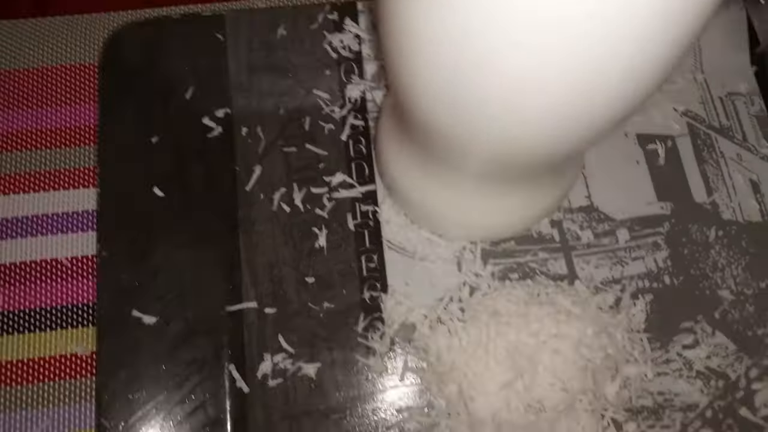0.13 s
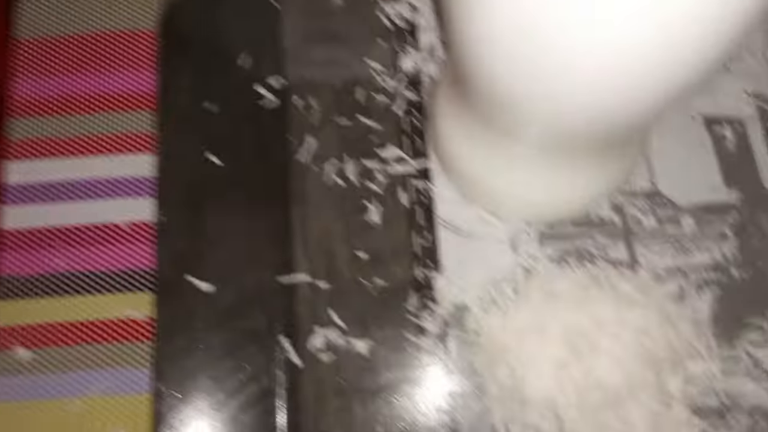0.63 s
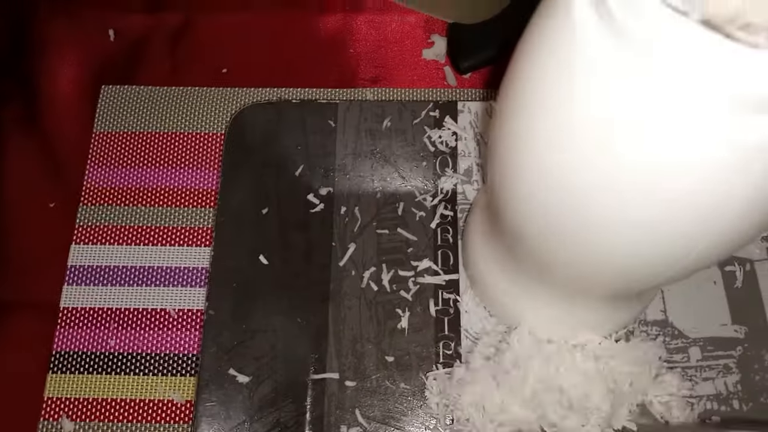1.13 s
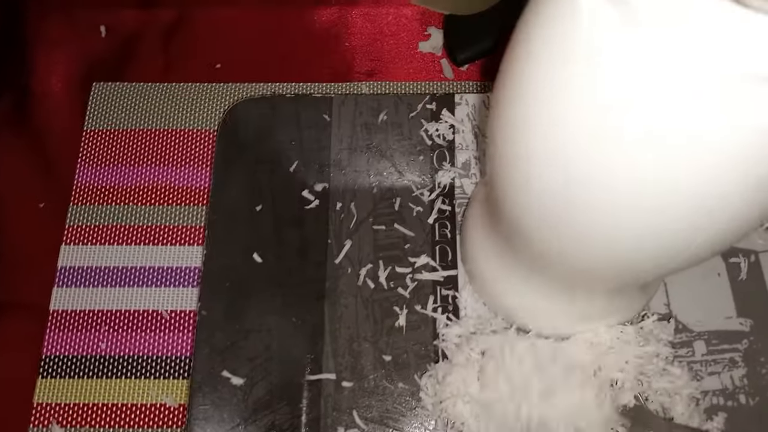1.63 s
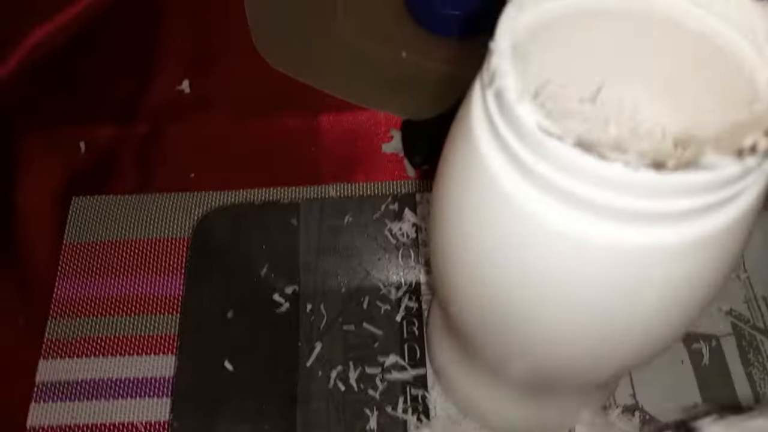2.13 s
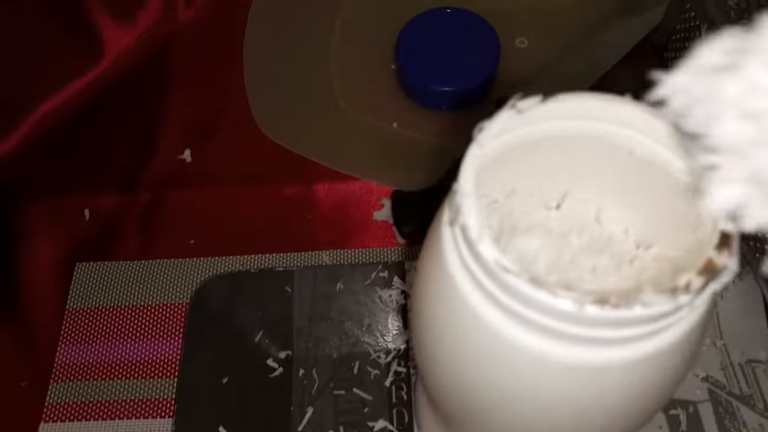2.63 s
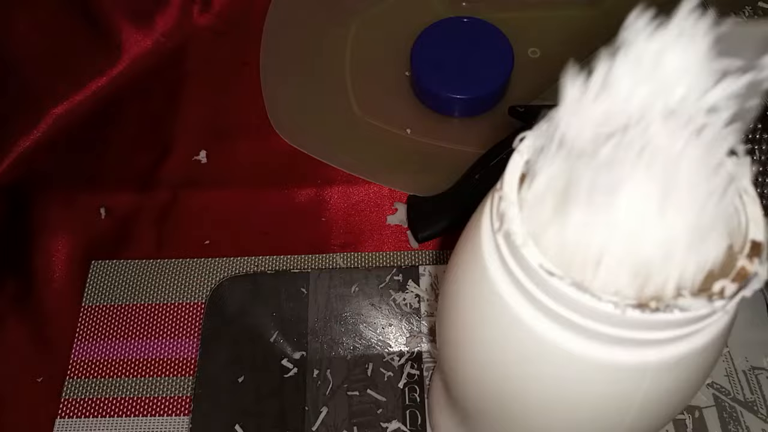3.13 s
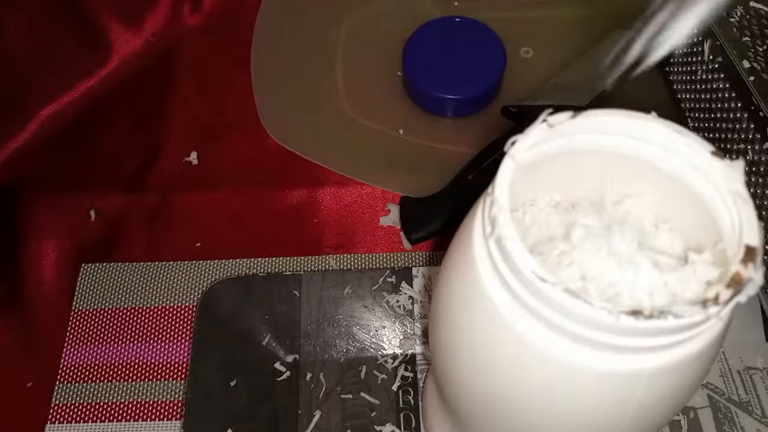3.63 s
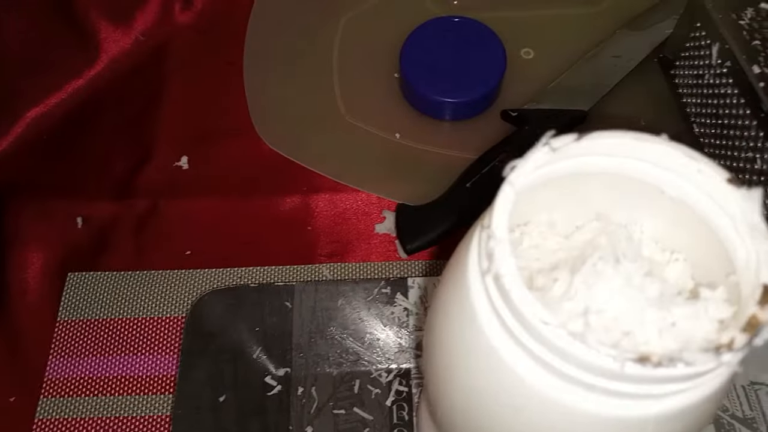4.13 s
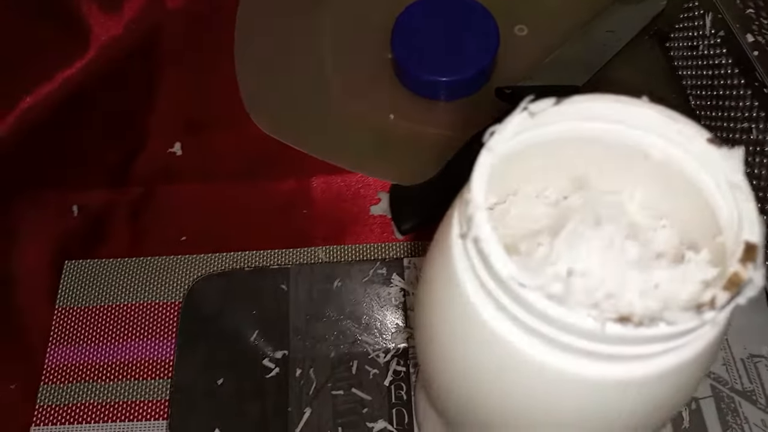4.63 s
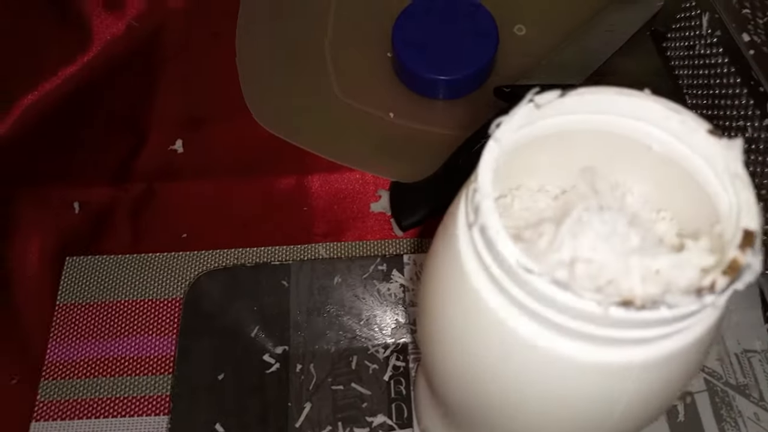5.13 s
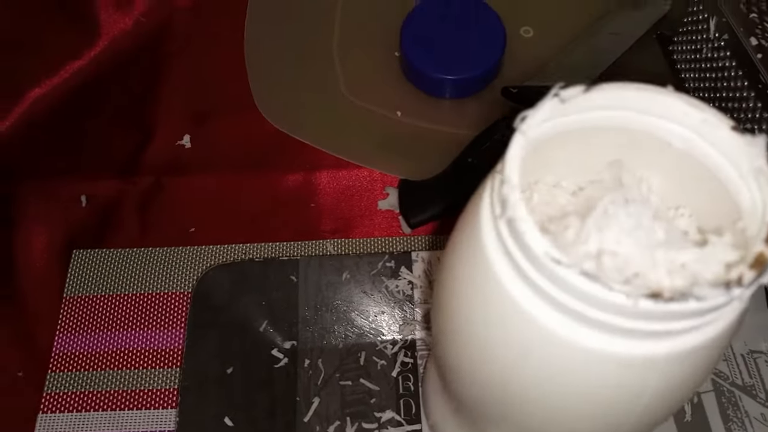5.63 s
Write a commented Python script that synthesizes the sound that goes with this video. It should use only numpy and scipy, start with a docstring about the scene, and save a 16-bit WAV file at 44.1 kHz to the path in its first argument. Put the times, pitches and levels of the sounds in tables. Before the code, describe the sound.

A metal spoon knocks a plastic jar's rim in two busy clusters, shreds slithering, with a near-quiet gap between in a small kitchen.

```python
"""In a small kitchen, close to a phone, a metal spoon knocks on the rim of a plastic jar: ringing modes and short snaps.
From the first knocks shreds of food slither as jar-coloured noise, and a wash of narrow streaks hangs after blows.
A low hum of two sines swells and fades until past three seconds; from one second a bird sings faintly outside
in gliding sines. Late knocks and bounces come in clusters. Soft noise hisses and rumbles throughout."""
import sys
import numpy as np
from scipy import signal
from scipy.fft import rfft, irfft, next_fast_len
from scipy.io import wavfile
from scipy.ndimage import map_coordinates

SR = 44100
rng = np.random.default_rng(int(sys.argv[2]) if len(sys.argv) > 2 else 0)


def volts_from_db(level):
    """Convert decibel levels to linear amplitude ratios."""
    exponent = np.asarray(level, float) / 20
    return 10 ** exponent


def generate_wav(signal):
    """Clip the signal to [-1, 1] and save it as 16-bit WAV at the path in sys.argv[1]."""
    frames = np.transpose(np.atleast_2d(signal))
    scaled = np.clip(frames, -1, 1) * 32767
    pcm = np.round(scaled).astype(np.int16)
    wavfile.write(sys.argv[1], SR, pcm)


N = 253575  # samples in the scene


def unit(x):
    """Scales a sound to rms 1."""
    return x / np.sqrt(np.mean(x ** 2) + 1e-20)


def along(points, hz):
    """Reads a curve of (Hz, value) points on a log frequency axis."""
    f, v = np.transpose(points)
    return np.interp(np.log(hz + 1), np.log(f + 1), v)


def curves(rows):
    """Gives one value per sample for each column after the time."""
    s, *cols = np.transpose(rows)
    return [np.interp(np.arange(N) / SR, s, c) for c in cols]


def wobble(rate, size=N):
    """A smooth random curve with rate knots a second."""
    knots = rng.standard_normal(int(size * rate / SR) + 4)
    return map_coordinates(knots, [np.arange(size) * rate / SR])


def noise(spectrum, size=N):
    """Noise of rms 1, coloured by a table of (Hz, dB)."""
    m = next_fast_len(size)
    gain = volts_from_db(along(spectrum, np.fft.rfftfreq(m, 1 / SR)))
    return unit(irfft(rfft(rng.standard_normal(m)) * gain, m)[:size])


def streaky(x, depth_db):
    """Noise broken into short narrow lines that come and go; rms 1."""
    streak_hz, streak_s = 90, .07  # width and life of a streak
    hz, t, z = signal.stft(x, SR, nperseg=1024)
    knots = rng.standard_normal((600, 400))
    places = np.meshgrid(hz / streak_hz, t / streak_s, indexing="ij")
    field = map_coordinates(knots, places, mode="mirror")
    return unit(signal.istft(z * volts_from_db(depth_db * field), SR, nperseg=1024)[1][:N])


def treble(x):
    """Keeps what lies above 8 kHz."""
    return signal.sosfilt(signal.butter(4, 8000, "high", fs=SR, output="sos"), x)


def add(out, s, sound):
    """Mixes a sound in at a time in seconds."""
    out[round(s * SR):][:len(sound)] += sound


# How long the small kitchen rings. Each row: frequency in Hz, time to fall by 60 dB in seconds.
KITCHEN_DECAY = [(150, .2), (700, 0.22), (3000, 0.33), (10000, 0.19)]


def room_tail(size):
    """The kitchen's answer as noise of energy 1 in which each frequency dies at its own speed."""
    hz, t, z = signal.stft(rng.standard_normal(size), SR, nperseg=256)
    fade = volts_from_db(-60 * t / along(KITCHEN_DECAY, hz)[:, None])
    tail = signal.istft(z * fade, SR, nperseg=256)[1][:size]
    return tail / np.linalg.norm(tail)


def with_echo(x, wet_db):
    """The sound, with the kitchen's answer starting 150 samples later."""
    echo = signal.fftconvolve(x, np.pad(room_tail(SR // 2), (150, 0)))
    return np.pad(x, (0, len(echo) - len(x))) + volts_from_db(wet_db) * echo


# Swells of the rumble under the room. Each row: time in seconds, level in dB.
RUMBLE_LEVEL = [(0, -72), (.5, -64.5), (.76, -55.5), (.95, -73.5), (1.2, -72), (1.3, -59), (1.7, -70),
                (1.95, -74), (2.12, -61.5), (2.3, -68.5), (2.85, -70.5), (3.15, -58), (3.5, -70),
                (5.75, -73.5)]
# Colour of the rumble. Each row: frequency in Hz, relative level in dB per Hz.
RUMBLE_COLOUR = [(15, -51), (25, -26), (68, -1), (119, -3.5), (270, -21), (320, -23.5), (420, -52),
                 (700, -120)]


def rumble():
    """Low noise whose level swells in slow lumps."""
    return volts_from_db(curves(RUMBLE_LEVEL)[0] + 1.5 * wobble(12)) * noise(RUMBLE_COLOUR)


# Colour of the soft room hiss. Each row: frequency in Hz, relative level in dB per Hz.
HISS_COLOUR = [(88, -31.5), (150, -8), (281, -3), (317, -11), (738, -11.5), (1620, -16), (5700, -25.5),
               (15300, -50.5), (16500, -44.5)]


def hiss():
    """Soft streaky noise that hovers around one level."""
    return volts_from_db(-71.5 + 0.73 * wobble(6.2)) * streaky(noise(HISS_COLOUR), depth_db=2.5)


# Notes of the bird outside. Each row: start in seconds, length in seconds, starting pitch in Hz,
# level in dB before doubling.
BIRD_NOTES = [(0.989, 0.15, 2350, -77), (1.812, .12, 5580, -78), (2.072, 0.069, 4820, -80),
              (2.221, 0.16, 4330, -83.5), (3.534, 0.047, 5040, -78.5), (3.647, 0.041, 5100, -76),
              (3.844, 0.044, 5760, -76.5), (4.957, 0.074, 4880, -77), (5.268, 0.26, 8010, -84)]


def bird():
    """Thin whistles, each a sine gliding down with a waver, blurred by distance and echo."""
    droop_hz = 90  # every note sinks this much
    out, blur = np.zeros(N), volts_from_db(3.7 * wobble(160))
    for s, length, hz, db in BIRD_NOTES:
        u = np.linspace(0, 1, round(length * SR))
        pitch = hz - droop_hz * u + 60 * wobble(150, size=len(u))
        swell = np.sin(np.pi * u ** 0.58)
        add(out, s, 2 * volts_from_db(db) * np.sin(2 * np.pi * np.cumsum(pitch) / SR) * swell)
    return blur * (out + signal.fftconvolve(out, room_tail(SR // 2))[:N])


# Path of the low hum. Each row: time in seconds, pitch in Hz, level in dB.
HUM_PATH = [(0, 119, -76), (.06, 119, -55), (.12, 119, -52.5), (.15, 119.2, -80), (.62, 99.8, -89.5),
            (.68, 101.5, -57.5), (.8, 108, -49), (.85, 108.7, -50), (.91, 108.1, -97), (2.78, 102.2, -79.5),
            (3, 104.2, -46), (3.33, 111, -45), (3.4, 115, -49.5), (3.43, 116.1, -72.5), (3.5, 115.7, -54.5),
            (3.62, 116, -74.5), (3.8, 112, -89)]


def hum():
    """A low sine with a weak octave; pitch and both levels waver."""
    hz, db = curves(HUM_PATH)
    phase = 2 * np.pi * np.cumsum(hz * (1 + 0.03 * wobble(40))) / SR
    ground = volts_from_db(1.8 * wobble(25)) * np.sin(phase)
    octave = volts_from_db(-24.5 + 6.2 * wobble(24)) * np.sin(2 * phase)
    return np.sqrt(2) * volts_from_db(db) * (ground + octave)


# Course of a thin treble rustle. Each row: time in seconds, level in dB.
RUSTLE_LEVEL = [(.7, -100), (.78, -71.5), (.88, -81.5), (.92, -65), (1.1, -75.5), (1.75, -82), (2.3, -91),
                (3, -97)]
# Treble colour of shreds, rustle and ticks. Each row: frequency in Hz, relative level in dB per Hz.
TREBLE_COLOUR = [(2650, -36.5), (4500, -7), (5270, -1.5), (7960, -12.5), (11000, -2.5), (13100, -16.5),
                 (15700, -2.5), (16200, -14.5), (16500, -51)]


def rustle():
    """Thin streaky treble noise with an uneven level."""
    level = volts_from_db(curves(RUSTLE_LEVEL)[0] + 1.5 * wobble(25))
    return level * streaky(noise(TREBLE_COLOUR), depth_db=6.5)


# What jar and spoon ring: body below 600 Hz, rim to 1000 Hz, wall above, the spoon bowl near 4 kHz.
# Each row: frequency in Hz, relative level in dB, free time to fall by 60 dB in seconds.
MODES = [(212, -7.5, 0.42), (290, -2, 0.11), (383, -1, 0.26), (486, 2, 0.1), (551, 1, 0.12),
         (740, -3.5, 0.1), (779, 7.5, 0.08), (808, -0.5, .06), (1173, -9, 0.086), (1453, -3.5, 0.089),
         (1640, -3.5, 0.084), (1770, -4, 0.023), (2034, -3, .07), (2190, -4, .08), (2527, -6, 0.049),
         (2836, -1, 0.042), (3336, -10.5, .07), (4020, -8, 0.16), (4075, -8, 0.13), (5280, -5, 0.04),
         (5830, -8, 0.088)]


def jar_wall(x, between):
    """Noise of rms 1 lifted at the modes of the jar; between = gain of the valleys."""
    f = np.fft.rfftfreq(N, 1 / SR)
    wall = sum(1 / (1 + ((f - hz) * t60 / 3) ** 2) for hz, _, t60 in MODES if hz < 3800)
    return unit(irfft(rfft(x) * (between + wall), N))


# Washes left hanging after blows. Each row: time of the peak in seconds, level in dB.
WASHES = [(0, -49.5), (.3, -56.5), (.36, -57), (.6, -61), (.95, -64.5), (3.3, -70.5), (4.62, -64),
          (5.27, -61.5)]
# Colour of the wash. Each row: frequency in Hz, relative level in dB per Hz.
WASH_COLOUR = [(800, -40), (1400, -6), (2200, -0.5), (4300, -5.5), (6500, -15), (9000, -27.5), (16000, -40)]


def linger():
    """A fading wash, mostly between 1.5 and 6 kHz, broken into many narrow unsteady lines."""
    rise_s, fade_db_per_s = 0.048, 190
    s, db = np.transpose(WASHES)[:, :, None]
    since = np.arange(N) / SR - s
    rise = np.clip(1 + since / rise_s, 0, 1)
    level = (rise * volts_from_db(db - fade_db_per_s * np.clip(since, 0, None))).sum(0)
    wash = jar_wall(streaky(noise(WASH_COLOUR), depth_db=6), between=.6)
    return level * unit(volts_from_db(1.3 * wobble(65))) * wash


# Shreds of food sliding. Each row: loudest moment in seconds, rise in seconds, level in dB,
# fade to -20 dB in seconds, treble against that level in dB.
SHRED_SLIDES = [(.135, 0.006, -37, 0.142, -2), (0.225, .07, -38, 0.0453, 2.5),
                (0.269, 0.018, -51, 0.1074, -9), (.56, .015, -48, 0.08, -6), (3.166, 0.047, -62, 0.08, -6),
                (3.335, 0.016, -66.5, 0.01, -8), (4.446, 0.017, -36.5, 0.1, -9.5),
                (4.595, 0.05, -46, 0.0123, -7.5), (5.16, 0.018, -50, 0.09, -3),
                (5.22, 0.021, -43, 0.0644, -4), (5.59, 0.013, -29, 0.04, -2), (5.66, 0.063, -42, 0.24, 4)]
# Lower colour of the shreds. Each row: frequency in Hz, relative level in dB per Hz.
SHRED_COLOUR = [(180, -43.5), (300, -12.5), (535, -15.5), (777, -4.5), (1310, -7.5), (2130, -6),
                (2890, -10), (4500, -10), (5850, -42.5), (9900, -120)]


def shreds():
    """Loose shreds slide and patter in uneven clumps, and the jar wall colours their lower noise."""
    rise_power, fade_bend, treble_fades = 0.99, 1.8, 1.1  # the fade speeds up; the treble dies faster
    s, rise, db, fade, treble_db = np.transpose(SHRED_SLIDES)[:, :, None]
    times = np.arange(N // 40 + 2) * 40 / SR  # one level every 40 samples
    since = times - s
    swell = volts_from_db(db) * np.clip(1 + since / rise, 0, 1) ** rise_power
    fade_db = -20 * (np.clip(since, 0, None) / fade) ** fade_bend
    low_level = (swell * volts_from_db(fade_db)).sum(0)
    high_level = (swell * volts_from_db(treble_db + treble_fades * fade_db)).sum(0)
    low_gain, high_gain = curves(np.transpose([times, low_level, high_level]))
    clumps = unit(volts_from_db(1.8 * wobble(400) + 1.3 * wobble(90)))
    low = jar_wall(streaky(noise(SHRED_COLOUR), depth_db=3.5), between=0.53)
    high = unit(volts_from_db(2.5 * wobble(70))) * streaky(noise(TREBLE_COLOUR), depth_db=4.5)
    return clumps * (low_gain * low + high_gain * high)


STRIKE = SR // 4  # samples computed for each blow, tick and touch, before its echo
STRIKE_T = np.arange(STRIKE) / SR

# Faint treble ticks. Each row: start in seconds, level in dB.
TREBLE_TICKS = [(4.022, -51), (4.122, -53.5)]


def ticks():
    """Brief bursts of noise above 8 kHz, with the kitchen's answer."""
    out = np.zeros(N + 2 * SR)
    for s, db in TREBLE_TICKS:
        burst = volts_from_db(db - 60 * STRIKE_T / 0.035) * treble(noise(TREBLE_COLOUR, size=STRIKE))
        add(out, s, with_echo(burst, -8.5))
    return out[:N]


# Light touches that ring one pitch. Each row: start in seconds, pitch in Hz, level in dB,
# time to fall by 60 dB in seconds.
LIGHT_TOUCHES = [(.128, 206.7, -29, 0.26), (0.542, 188, -16, 0.025), (2.22, 2298, -55, 0.035),
                 (2.874, 328, -52, 0.16), (2.874, 200, -50, 0.13), (3.12, 532, -44, 0.054),
                 (3.136, 5166, -37.5, 0.0094), (3.149, 322, -41, 0.12), (3.163, 553, -40, 0.13),
                 (3.17, 777, -46.5, 0.058), (3.225, 586, -56, 0.35), (3.433, 2365, -48, 0.054),
                 (4.791, 5030, -36, 0.017), (4.796, 244.2, -33.5, 0.075)]


def touches():
    """Single dying sines, unsteady in pitch and level."""
    out = np.zeros(N + 2 * SR)
    for s, hz, db, t60 in LIGHT_TOUCHES:
        phase = 2 * np.pi * np.cumsum(hz + 35 * wobble(90, size=STRIKE)) / SR
        onset = 1 - np.exp(-STRIKE_T / (.025 * t60))
        ping = volts_from_db(db - 60 * STRIKE_T / t60) * np.sin(phase) * onset
        add(out, s, with_echo(ping * volts_from_db(3.9 * wobble(200, size=STRIKE)), -15.5))
    return out[:N]


def ring_modes(thud_db, rim_db, bowl_db, spot_hz, rim_hz, share):
    """Each mode is a decaying sine of chance strength; modes near the struck spot's pitch are lifted."""
    favour_db, favour_octaves = 8.5, 0.53  # lift near the favoured pitch, and its reach
    hz, level_db, t60 = np.transpose(MODES)[:, :, None]
    body, rim, bowl = hz < 600, (hz >= 600) & (hz < 1000), (hz > 3800) & (hz < 4500)
    wall = ~body & ~rim & ~bowl
    luck = rng.standard_normal((2, len(hz), 1))
    pitch = np.where(rim, hz * rim_hz / hz[rim].mean(), hz)
    favour = favour_db * np.exp(-(np.log2(hz / spot_hz) / favour_octaves) ** 2)
    gain = volts_from_db(level_db + favour + 2.5 * luck[0])
    # chance shares out the energy inside each part
    for part, part_db in ((body, thud_db), (rim, rim_db), (bowl, bowl_db), (wall, -1)):
        gain[part] *= volts_from_db(part_db) / np.linalg.norm(gain[part])
    # soft plastic never holds a pitch
    drift = np.cumsum(rng.standard_normal((len(hz), STRIKE // 8)), axis=1).repeat(8, axis=1)
    drift = np.pad(drift, ((0, 0), (STRIKE % 8, 0)))
    phase = 2 * np.pi * pitch * (1 + .01 * luck[1]) * STRIKE_T + .07 * drift
    # the resting spoon damps everything but its own bowl
    fade = volts_from_db(-60 * STRIKE_T / (np.where(bowl, 1, share) * t60))
    return (gain * fade * np.sin(phase)).sum(0)


# Colour of the snap of contact. Each row: frequency in Hz, relative level in dB per Hz.
CRACK_COLOUR = [(590, -34.5), (1000, -2), (2070, -8), (5670, -8.5), (8070, -13), (10200, -14),
                (15600, -27.5)]
# Blows of the spoon. Each row: start in seconds, clink in dB, then against the clink thud of the jar body in dB,
# rim in dB, spoon bowl in dB and treble crack in dB (before an 8.5 dB lift), pitch the struck spot favours in Hz,
# pitch of the rim in Hz, share of the free ring time that the resting spoon allows from 0 to 1.
SPOON_BLOWS = [(0.1263, -11.5, -16, -10, -26, -18, 3020, 803, 0.79),
               (0.1303, -22, -13, 6.5, -30, -22.5, 1800, 768, 0.83),
               (.181, -17, -13.5, 2.5, -17.5, -28.5, 1720, 778, 0.76),
               (0.5397, -29.5, 1, -35, -20, -8, 2480, 784, 0.65),
               (.5524, -16.5, -9, -18.5, -24.5, -11, 2580, 785, 0.56),
               (0.6305, -35.5, -4, 11, -22, -32, 1350, 741, 0.49),
               (3.1362, -47, -6, -11, -16, -3, 3190, 780, 0.54),
               (4.2829, -17.5, -30.5, -2, -26.5, -11.5, 2700, 823, 0.87),
               (4.3005, -27.5, -14, -12, -22.5, -4, 3220, 800, 0.94),
               (4.3603, -16, -32, -2, -26.5, -21.5, 1900, 818, 0.72),
               (4.431, -26, -18, 0, -30, -19, 1600, 753, 0.96),
               (4.7898, -47.5, -3, -30, -16, -1, 3320, 780, .55),
               (5.131, -23.5, 4, 5.5, -15, -14, 2594, 840, 0.56),
               (5.1496, -16.5, -4, 2, -18, -33, 2800, 820, 0.52),
               (5.158, -21, -3.5, 3, -18, -28, 1600, 840, 0.51),
               (5.2095, -27.5, -14, -3.5, -26, -23, 2990, 858, 0.69),
               (5.573, -15.5, -16.5, -1, -24, -5.5, 1340, 764, 0.87)]


def spoon():
    """Each blow rings jar and spoon at new strengths, buzzes, snaps, and echoes round the kitchen."""
    soft_s, hard_db = .002, -30  # contact time of the softest blows; the clink level that halves it
    out, t = np.zeros(N + 2 * SR), STRIKE_T
    for s, db, thud_db, rim_db, bowl_db, crack_db, spot_hz, rim_hz, share in SPOON_BLOWS:
        hardness = volts_from_db(db - hard_db)
        contact_s = soft_s / (1 + hardness)
        ring = ring_modes(thud_db, rim_db, bowl_db, spot_hz, rim_hz, share)
        # the spoon keeps touching: a lumpy ring
        grip = volts_from_db(2.2 * wobble(300, size=STRIKE) * (1 - np.exp(-t / .008)))
        tone = grip * ring * (1 - np.exp(-t / contact_s))
        # the contact buzzes briefly, duller on a low spot and weaker in soft blows
        dull_b, dull_a = signal.butter(1, min(3 * spot_hz, SR / 4), fs=SR)
        buzz = signal.lfilter(dull_b, dull_a, noise(CRACK_COLOUR, size=STRIKE))
        chatter = hardness / (1 + hardness) * volts_from_db(-3.0 - 60 * t / (share * 0.07)) * buzz
        snap_gain = volts_from_db(crack_db + 8.5 - 60 * t / (share * 0.045))
        snap = snap_gain * treble(noise(CRACK_COLOUR, size=STRIKE))
        add(out, s, volts_from_db(db) * (with_echo(tone, -13.5) + with_echo(grip * chatter + snap, -9.0)))
    return out[:N]


def scene():
    """One microphone; its port thins the close sounds below 150 Hz and above 15.9 kHz, and dips near 8 kHz."""
    bass_cut = signal.butter(3, 150, "high", fs=SR, output="sos")
    top_cut = signal.cheby1(10, 1, 15900, fs=SR, output="sos")
    close = spoon() + touches() + ticks() + shreds() + linger()
    close = signal.sosfilt(np.vstack([bass_cut, top_cut]), close)
    notch_b, notch_a = signal.iirnotch(8050, 4, fs=SR)
    close = signal.lfilter(notch_b, notch_a, close) * .7 + close * .3  # a partial dip
    return (close + hum() + bird() + rumble() + hiss() + rustle())[None]


def band_limit(x):
    """A steep low-pass at the top of the band."""
    return signal.sosfilt(signal.butter(12, 16990, fs=SR, output="sos"), x)


def record(dry):
    """The phone takes down the finished mix."""
    return band_limit(dry)


dry = scene()
out = record(dry)
generate_wav(out)
```